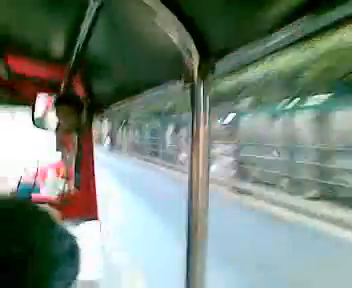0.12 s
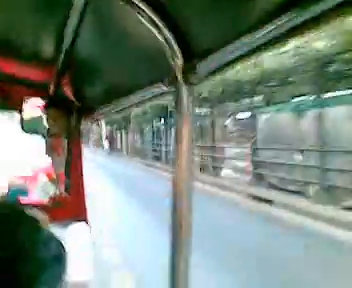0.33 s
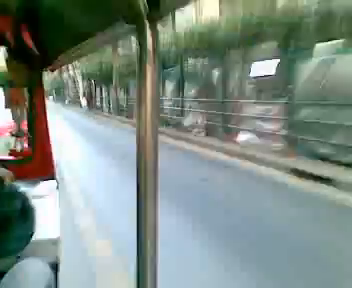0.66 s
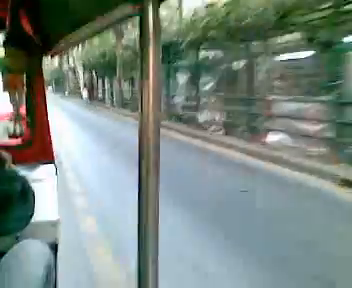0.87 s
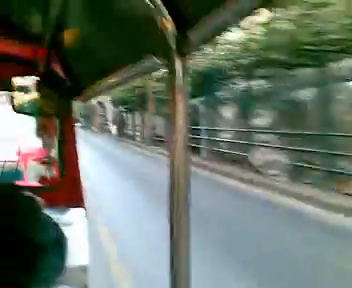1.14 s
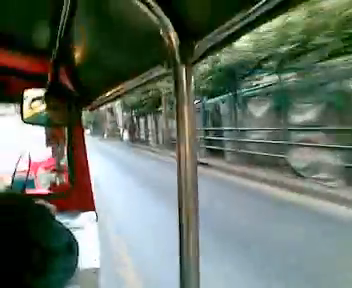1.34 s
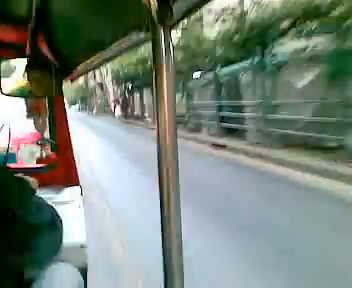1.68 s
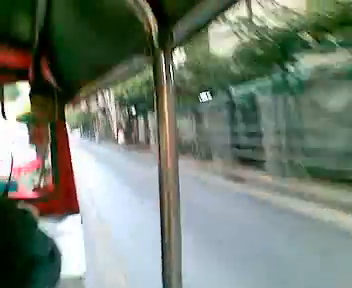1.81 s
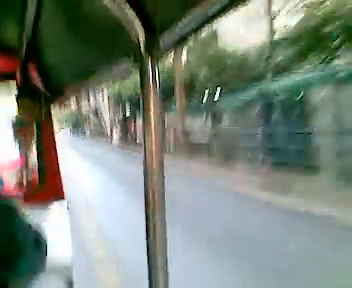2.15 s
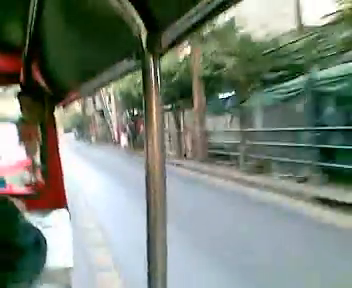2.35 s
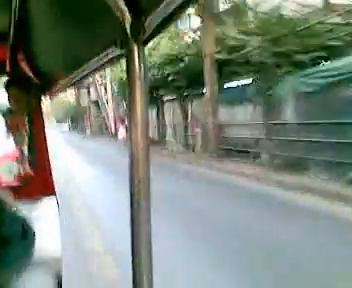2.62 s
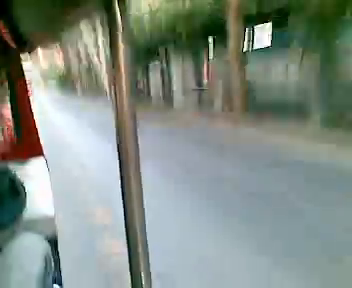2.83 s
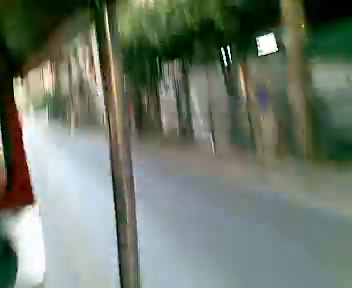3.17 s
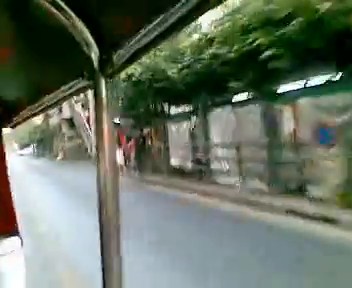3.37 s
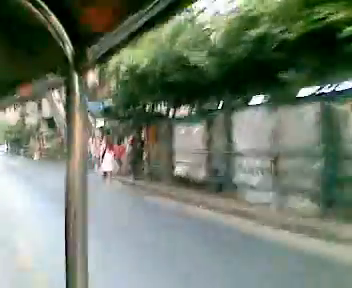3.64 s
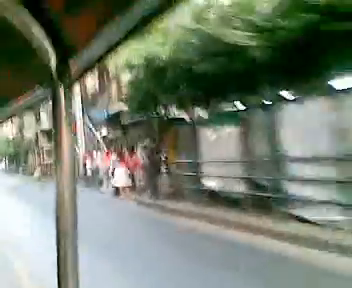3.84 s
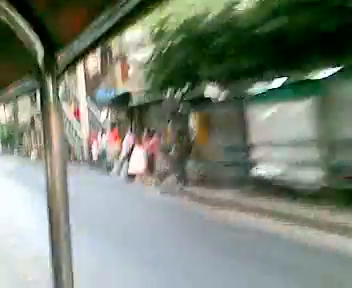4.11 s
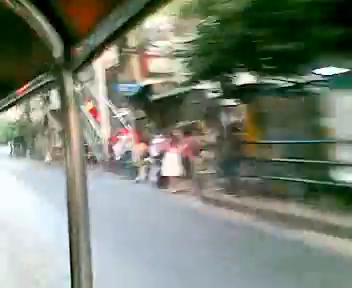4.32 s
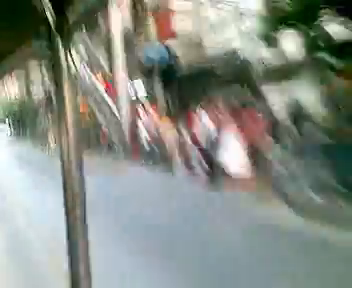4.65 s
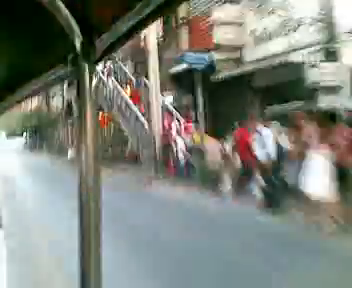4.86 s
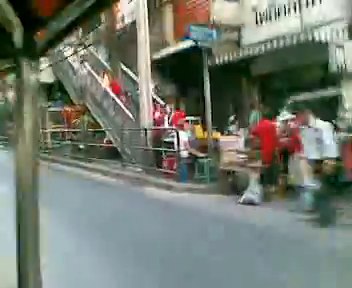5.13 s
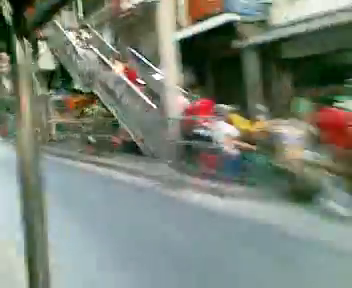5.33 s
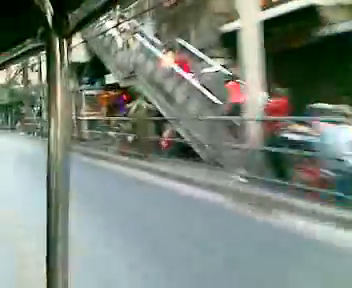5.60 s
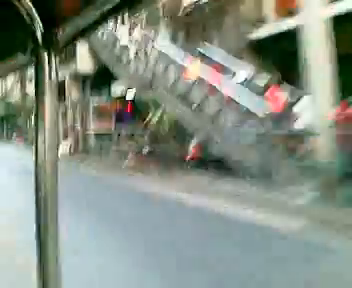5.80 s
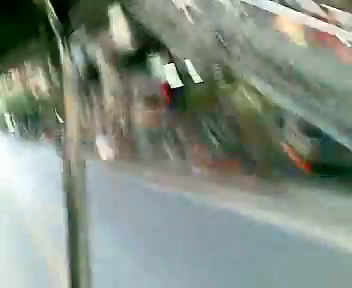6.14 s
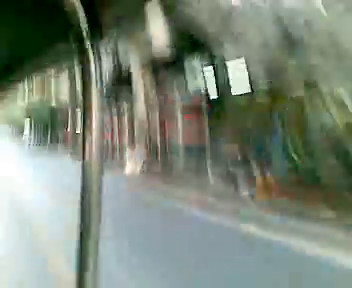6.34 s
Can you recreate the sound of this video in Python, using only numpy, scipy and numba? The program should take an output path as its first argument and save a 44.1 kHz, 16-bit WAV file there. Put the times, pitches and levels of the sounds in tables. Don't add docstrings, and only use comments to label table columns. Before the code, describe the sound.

Heard from the back seat of an open three-wheeler on a city street, a small twin engine throbs over road roar and low wind gusts. A distant horn fades and a nearby vehicle's pipe note climbs with the revs; two quick beeps sound. The engine coasts down, a loose part chatters past, and it pulls again at lower pitch. Another engine roars alongside, then a bump knocks the cab. Narrow, slightly crushed old phone microphone.

```python
import sys
import numpy as np
from scipy import signal
from scipy.fft import rfft, irfft
from scipy.io import wavfile
from scipy.ndimage import uniform_filter1d
from numba import njit

SR = 44100
rng = np.random.default_rng(int(sys.argv[2]) if len(sys.argv) > 2 else 0)


def gain_from_decibels(decibels):
    exponent = np.asarray(decibels, float) / 20
    return 10 ** exponent


def output_pcm(signal):
    pcm = np.clip(np.atleast_2d(signal).T, -1, 1) * 32767
    wavfile.write(sys.argv[1], SR, np.round(pcm).astype(np.int16))


N = 285768
TIME = np.arange(N) / SR

# (time [s], level [dB])
TRAFFIC = [(0.0, -55), (1.0, -55.5), (2.7, -53.5), (3.16, -56.5), (3.9, -53), (4.5, -52), (4.95, -48.5),
           (5.6, -51), (6.48, -53.5)]
# (frequency [Hz], density [dB])
ROAD_SPECTRUM = [(40, -12), (130, 6), (250, -2.5), (500, -9.5), (1000, -15), (1600, -15), (2000, -19.5),
                 (3200, -22), (4000, -23.5), (4800, -30), (5400, -27), (6000, -34.5), (7200, -40)]
# (frequency [Hz], density [dB])
WIND_SPECTRUM = [(15, -0.5), (30, -1.5), (60, 4), (90, 4), (150, -33), (300, -40.5)]
# (time [s], rise over breeze [dB], length [s])
GUSTS = [(0.017, 5.5, 0.11), (0.535, 5, 0.28), (1.553, 4, .25), (2.28, 1.5, 0.088), (2.901, 3.5, .6),
         (3.55, 6, 0.58), (3.954, 9, 0.16), (4.62, 4.5, .2), (5.0, 4, 0.17), (6.013, 8, 0.106),
         (6.199, 5.5, 0.28), (6.41, 8, .08)]
# (multiple [1], level [dB])
HELD_TONES = [(7, -15), (8, -5), (9, 1), (10, -4), (11, -13)]
# (start [s], length [s], level [dB])
BEEPS = [
    (2.695, 0.068, -44.5),
    (2.933, 0.085, -42.5),
]
# (multiple [1], level [dB])
BEEP_TONES = [(6, -0.5), (7, -9.5), (8, -21), (9, -14.5), (10, -14.5), (11, -26), (12, -16), (13, -16),
              (14, -22), (15, -23), (16, -25), (17, -22.5), (18, -37)]
# (start [s], length [s], first [Hz], last [Hz], level [dB])
PIPE_NOTES = [
    (0, .5, 430, 447, -48),
    (.55, .24, 455, 464, -40),
    (.94, .22, 452, 460, -38),
    (1.2, .9, 461, 500, -49),
    (2.1, .84, 500, 562, -46),
]
# (start [s], length [s], first ring [Hz], last ring [Hz], level [dB])
RATTLES = [
    (3.58, .09, 4200, 4100, -58),
    (3.97, .41, 3550, 2720, -47),
    (4.03, .11, 3450, 3200, -49),
    (4.14, .62, 2900, 2800, -50),
    (4.05, .75, 3300, 3100, -54),
    (4.3, .2, 1350, 1310, -48),
]
# (time [s], peak [dB], ring [Hz])
BUMP_KNOCKS = [
    (6.401, -17.5, 150),
    (6.404, -18.5, 265),
    (6.411, -26.5, 199),
    (6.418, -19.5, 60.7),
    (6.43, -20, 138),
]
# (time [s], peak [dB], ring [Hz])
FRAME_TAPS = [
    (3.775, -27, 480),
    (4.767, -24.5, 1150),
    (4.978, -33, 1600),
    (6.405, -25, 620),
    (6.413, -28.5, 840),
    (6.43, -27, 700),
]
# (time [s], firing rate [Hz], level [dB], throttle [0-1])
ALONGSIDE = [
    (4.55, 83.63, -40, .5),
    (4.74, 87.1, -33, 0.9),
    (4.85, 91.64, -21, 0.65),
    (5.0, 96.6, -27.5, 0.27),
    (5.15, 101.6, -30.5, 1),
    (5.36, 107.4, -28.5, 0.11),
    (5.46, 100.8, -43, .3),
    (5.6, 93.1, -31, .3),
    (5.95, 84.8, -39.5, .5),
]
# (time [s], crank rate [Hz], level [dB], throttle [0-1])
RIDE = [(0.0, 49.5, -31, 0.38), (0.45, 51.2, -31.5, 0.37), (0.65, 52.5, -30, 1), (0.76, 52.3, -33.5, 0.67),
        (0.87, 52.03, -38.5, 0.05), (1.17, 52.14, -27.5, 0), (1.8, 55.57, -29.5, 0.52),
        (2.36, 59.62, -26.5, .9), (2.85, 64.14, -29.5, 1), (2.96, 63.02, -38.5, 0.45),
        (3.8, 52.15, -43.5, 0.4), (3.95, 49.34, -30, 0.76), (4.15, 44.94, -30.5, 0.6),
        (4.42, 40.75, -26.5, 0.57), (5.08, 43.12, -29.5, 0.73), (5.5, 43.53, -43, 0.58),
        (5.98, 44.85, -28.5, 0.62), (6.48, 46.43, -28.5, .6)]
# (frequency [Hz], width [Hz], level [dB])
SILENCER = [(103.5, 29.5, 0)]
# (frequency [Hz], width [Hz], level [dB])
CAB_FLOOR = [(173.2, 42, -1.5), (208.4, 26, -1)]
# (frequency [Hz], width [Hz], level [dB])
TAIL_PIPE = [(421.8, 35.6, 11), (620, 37, 3.5), (327, 48, 4.5), (481, 25, -9), (274, 100, -2)]


def unit(x):
    return x / np.sqrt(np.mean(x ** 2))


def read(table):
    s, *columns = np.transpose(table)
    return [np.interp(TIME, s, c) for c in columns]


def window(table, fade_s):
    edge_s = np.minimum(TIME - table[0][0], table[-1][0] - TIME)
    return np.clip(edge_s / fade_s + .5, 0, 1)


def swell(start_s, length_s, edge):
    edge_s = np.minimum(TIME - start_s, start_s + length_s - TIME)
    return np.clip(edge_s / (edge * length_s) + .5, 0, 1)


@njit
def svf(x, hz, width_hz):
    y, band, low = np.empty(len(x)), 0., 0.
    for i in range(len(x)):
        g, k = np.tan(np.pi * hz[i] / SR), width_hz / hz[i]
        v = (band + g * (x[i] - low)) / (1 + g * (g + k))
        band, low, y[i] = 2 * v - band, low + 2 * g * v, k * v
    return y


def ring(x, modes):
    return sum(gain_from_decibels(db) * svf(x, np.full(N, 1. * hz), 1. * width_hz) for hz, width_hz, db in modes)


def steady(x):
    return x / np.sqrt(uniform_filter1d(x ** 2, SR // 3) + 1e-18)


def steep(x, modes):
    forward = ring(x, modes)
    return steady(ring(forward[::-1].copy(), modes)[::-1])


def noise_band(hz, width_hz):
    return unit(ring(rng.standard_normal(N), [(hz, width_hz, 0)]))


def walk(rate_hz):
    k = int(SR / rate_hz)
    held = np.repeat(rng.standard_normal(N // k + 1), k)
    return 1.3 * uniform_filter1d(uniform_filter1d(held, k), k)[:N]


def coloured(spectrum, lo_hz, hi_hz):
    hz = np.fft.rfftfreq(N, 1 / SR) + 1e-3
    point_hz, db = np.transpose(spectrum)
    bins = rfft(rng.standard_normal(N)) * gain_from_decibels(np.interp(np.log(hz), np.log(point_hz), db))
    inside = irfft(bins * ((hz > lo_hz) & (hz < hi_hz)), N)
    return irfft(bins, N) / np.std(inside)


def firings(crank_hz, share, rough, late=0., scatter_db=7.):
    slip = .2
    turns = np.cumsum(crank_hz) / SR
    beat = np.arange(1, int(2 * turns[-1]))
    chance = rng.standard_normal((1000, 2))[:len(beat)]
    at = np.interp(beat / 2 + late * (beat % 2), turns, np.arange(N))
    i = at.astype(int)
    at = np.clip(at + slip * rough[i] * chance[:, 0] * SR / crank_hz[i] / 2, 0, N - 2)
    size = np.where(beat % 2, share[i], 1) * gain_from_decibels(scatter_db * rough[i] * chance[:, 1])
    pulses = np.zeros(N)
    np.add.at(pulses, at.astype(int), size)
    return pulses, (2 * turns) % 1


def street():
    hiss_follows, hiss_db = 0.37, 1.5
    breeze_db = -44.5
    roar_db = read(TRAFFIC)[0]
    mean_db = roar_db.mean()
    road = coloured(ROAD_SPECTRUM, lo_hz=1550, hi_hz=2480)
    roar = 0
    for hz in 70 * 2 ** np.arange(0, 7, .5):
        high = np.clip(np.log2(hz / 2000) / 3.1, 0, 1)
        low = np.clip(np.log2(hz / 100) / 1.4, 0, 1)
        follows = low - high * (1 - hiss_follows)
        db = follows * (roar_db - mean_db) + mean_db + high * hiss_db + 1.6 * walk(9.8)
        roar = roar + gain_from_decibels(db) * ring(road, [(hz, hz * .35, 0)])
    gusts_db = sum(db * np.exp(-(2 * (TIME - s) / length_s) ** 2 / 2) for s, db, length_s in GUSTS)
    wind = coloured(WIND_SPECTRUM, lo_hz=21.6, hi_hz=79.4)
    return roar + gain_from_decibels(breeze_db + gusts_db + 0.7 * walk(9)) * wind


def tones(hz, table, flutter_db, waver):
    turn = 2 * np.pi * np.cumsum(hz * (1 + waver * walk(25))) / SR
    out = 0
    for k, db in table:
        dip_db = flutter_db * np.minimum(walk(42), .6)
        out = out + gain_from_decibels(db + dip_db) * np.sqrt(2) * np.sin(k * turn + rng.uniform(0, 2 * np.pi))
    return out


def held_horn():
    level_db, end_s, stop_s = -43.5, .62, .05
    echo_db, echo_t60_s = -11, 1.5
    after_s = np.maximum(TIME - end_s, 0)
    held_db = level_db + echo_db * np.minimum(after_s / stop_s, 1) - 60 * after_s / echo_t60_s
    haze = noise_band(3150, 510)
    return gain_from_decibels(held_db) * (tones(357.4, HELD_TONES, 6.5, .003) + gain_from_decibels(-5) * haze)


def beeping_horn():
    street_t60_s, wall_db = .7, -7.5
    gate = sum(gain_from_decibels(db) * window([[s], [s + length_s]], fade_s=0.0017) for s, length_s, db in BEEPS)
    beeps = gate * tones(412.7, BEEP_TONES, 4., .0012)
    tail = rng.standard_normal(SR) * gain_from_decibels(-60 * TIME[:SR] / street_t60_s)
    tail = signal.sosfilt(signal.butter(4, 2700, fs=SR, output="sos"), tail)
    tail = tail / np.sqrt(np.sum(tail ** 2))
    return beeps + gain_from_decibels(wall_db) * signal.fftconvolve(beeps, tail)[:N]


def pipe_note():
    out = 0
    for s, length_s, first_hz, last_hz, db in PIPE_NOTES:
        hz = np.interp(TIME, [s, s + length_s], [first_hz, last_hz]) * (1 + .005 * walk(19.6))
        note = np.sqrt(2) * np.sin(2 * np.pi * np.cumsum(hz) / SR)
        out = out + swell(s, length_s, .3) * gain_from_decibels(db + 1.1 * walk(12)) * note
    return out


def chatter():
    shake_hz, speeds_up_s, rise_hz_per_s = 60.94, 4.09, 45
    decay_s, level_db, rush_db = .0015, 2.5, -53.5
    later_s = np.clip(TIME - speeds_up_s, 0, .5)
    crank_hz = (shake_hz + rise_hz_per_s * later_s) / 2
    pulses = firings(crank_hz, np.ones(N), .03 + .3 * later_s, scatter_db=15.)[0]
    pulses = np.minimum(pulses, 2)
    bursts = signal.lfilter([1], [1, -np.exp(-1 / (decay_s * SR))], pulses) + .1 + .5 * later_s
    out = swell(3.57, .9, 0.34) * gain_from_decibels(rush_db) * noise_band(3200, 1600)
    for s, length_s, first_hz, last_hz, db in RATTLES:
        passed = np.clip((TIME - s) / (0.94 * length_s), 0, 1)
        hz = last_hz + (first_hz - last_hz) * np.cos(np.pi / 2 * passed) ** 2
        width_hz = first_hz / 9
        struck = bursts * rng.standard_normal(N) + 4 * pulses
        rung = svf(svf(struck, hz, width_hz), hz, 1.4 * width_hz)
        out = out + swell(s, length_s, 0.21) * gain_from_decibels(db + level_db) * steady(rung)
    return out


def knocks():
    out, t = np.zeros(N + SR), TIME[:SR // 10]
    for s, db, hz in [*BUMP_KNOCKS, *FRAME_TAPS]:
        swing = 1.83 * np.sin(2 * np.pi * hz * t) * np.exp(-t * hz / 1.2)
        out[int(s * SR):][:len(t)] -= gain_from_decibels(db) * swing
    return out[:N]


def engine_alongside():
    bark_shut_db, bark_rise_db = -19, 15
    roar_level_db, roar_follows = -14, .35
    past_s, past_db = 5.4, -7.5
    firing_hz, db, throttle = read(ALONGSIDE)
    pulses, phase = firings(firing_hz / 2, np.full(N, .7), np.full(N, .04))
    boom = np.sqrt(2) * np.cos(2 * np.pi * phase)
    bark = steep(pulses, [(185, 37, -0.5), (304.0, 133, 19), (368, 40, -4.5), (480, 100, 14.5), (608, 60, 4.5)])
    throb = .15 + np.exp(-phase / .16)
    roar = unit(throb * ring(rng.standard_normal(N), [(1100, 160, 0), (1267, 110, -1.5)]))
    bark_db = bark_shut_db + bark_rise_db * throttle
    roar_db = roar_level_db - (1 - roar_follows) * (db + 27)
    away_db = past_db * np.clip((TIME - past_s) / 0.12, 0, 1)
    pipe = gain_from_decibels(away_db) * (gain_from_decibels(bark_db) * bark + gain_from_decibels(roar_db) * roar)
    return window(ALONGSIDE, fade_s=0.071) * gain_from_decibels(db) * (boom + pipe)


def own_engine():
    pull_db, coast_db, even, misfire = -34, -41, .07, .45
    lurch_db = 4.5
    drone_shut_db, drone_rise_db = -16, 17
    bark_shut_db, bark_rise_db, bark_follows, bark_db_per_hz = -50, 6, 0.97, 0.3965
    share_shut, share_open, share_per_hz = 0.98, 0.32, -0.028
    tail_share = 0.36

    crank_hz, boom_db, throttle = read(RIDE)
    rough = np.interp(boom_db, [coast_db, pull_db], [misfire, even])
    boom_db = boom_db + lurch_db * rough * walk(12)
    drone_db = boom_db + drone_shut_db + drone_rise_db * throttle
    bark_db = bark_shut_db + bark_rise_db * throttle + bark_follows * (boom_db - pull_db)
    bark_db = bark_db + bark_db_per_hz * (crank_hz - 50)
    gas_db = 0.5 * (bark_db + 41.5) - 50

    share = share_shut + (share_open - share_shut) * throttle + share_per_hz * (crank_hz - 50)
    pulses, phase = firings(crank_hz, np.clip(share, 0, 1), rough, late=0.071)
    tail = firings(crank_hz, np.clip(tail_share * share, 0, 1), rough, late=0.085)[0]

    boom = steep(pulses, SILENCER)
    dull = signal.sosfiltfilt(signal.butter(5, 228, fs=SR, output="sos"), pulses)
    drone = steep(dull, CAB_FLOOR)
    tail = signal.sosfilt(signal.butter(3, [240, 670], "band", fs=SR, output="sos"), tail)
    bark = steady(ring(tail, TAIL_PIPE))
    gas = unit(np.exp(-phase / 0.64) * noise_band(925, 55))
    return gain_from_decibels(boom_db) * boom + gain_from_decibels(drone_db) * drone + gain_from_decibels(bark_db) * bark + gain_from_decibels(gas_db) * gas


def scene():
    background = street() + held_horn() + beeping_horn() + pipe_note()
    passing = chatter() + knocks() + engine_alongside()
    return (background + passing + own_engine())[None]


def low_pass(x):
    return signal.sosfilt(signal.butter(12, 7350, fs=SR, output="sos"), x)


def record(dry):
    top_hz, drive, fade_s = 7200, 3.4, .003
    rounded = np.tanh(drive * dry) / drive
    narrow = signal.sosfilt(signal.ellip(12, .5, 80, top_hz, fs=SR, output="sos"), rounded)
    mix = narrow * np.clip((TIME[-1] - TIME) / fade_s, 0, 1)
    return low_pass(mix)


dry = scene()
out = record(dry)
output_pcm(out)
```